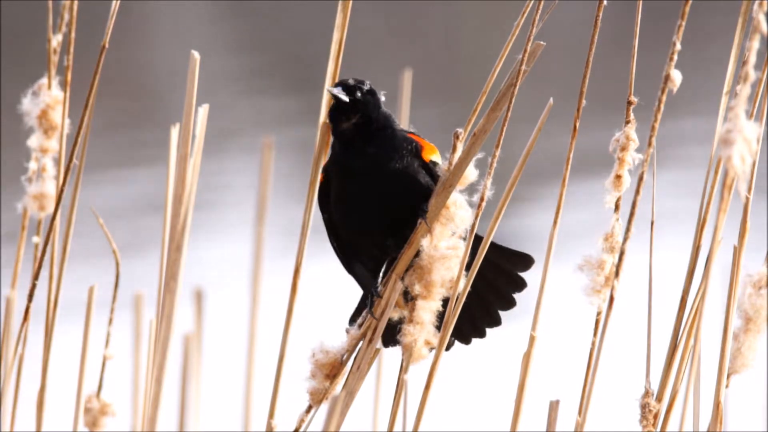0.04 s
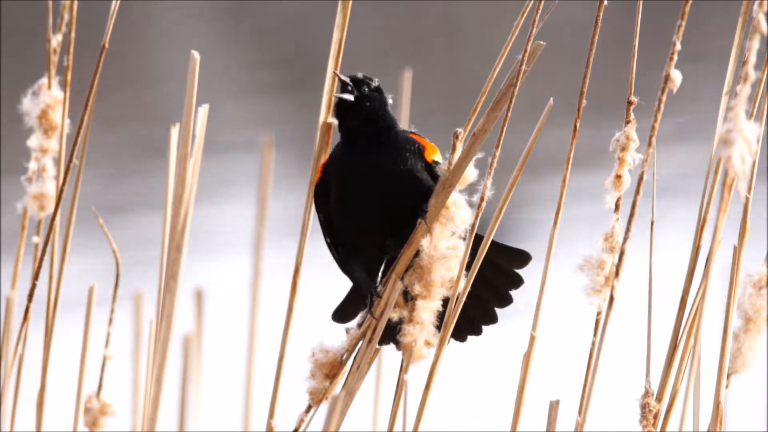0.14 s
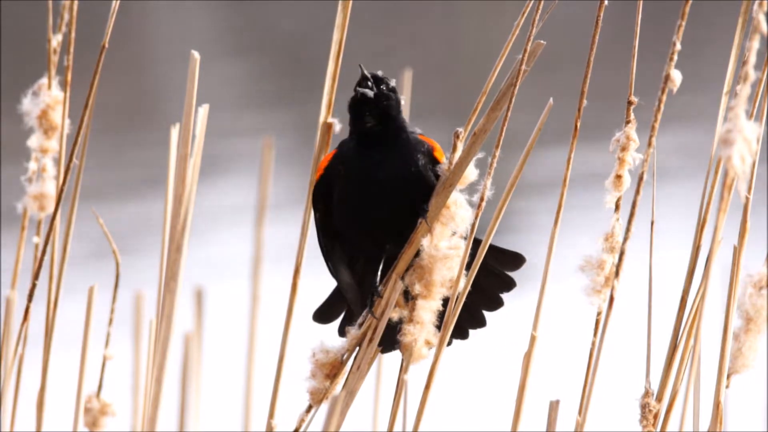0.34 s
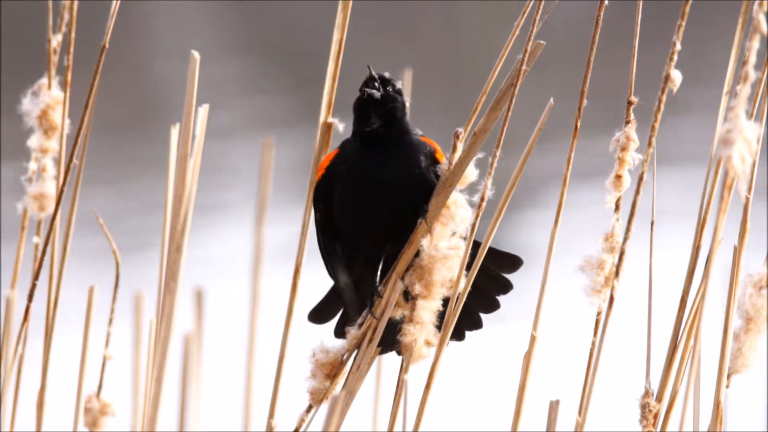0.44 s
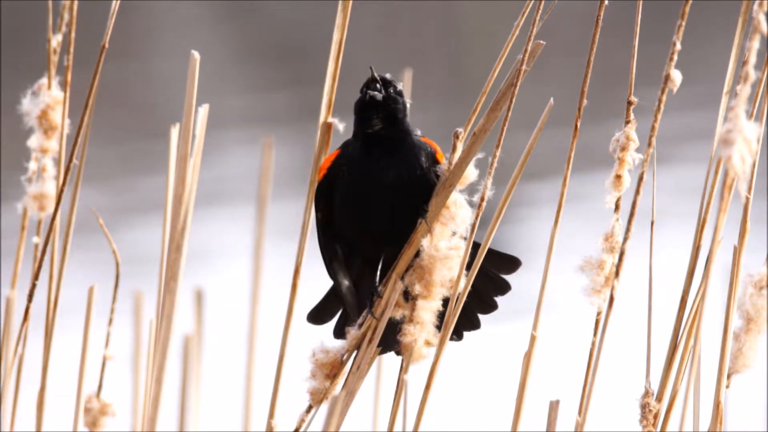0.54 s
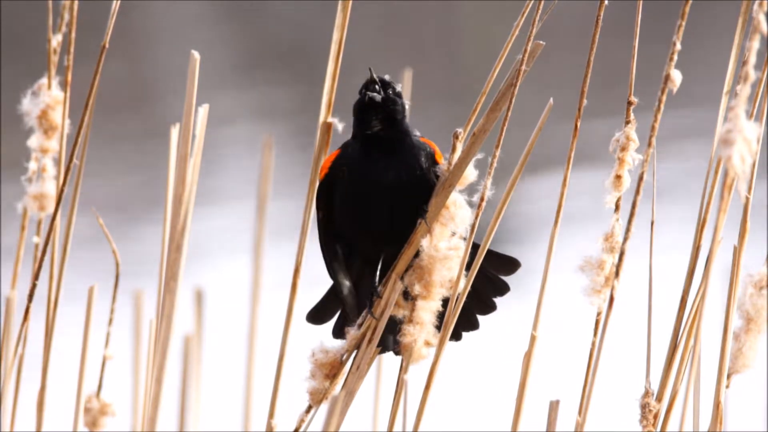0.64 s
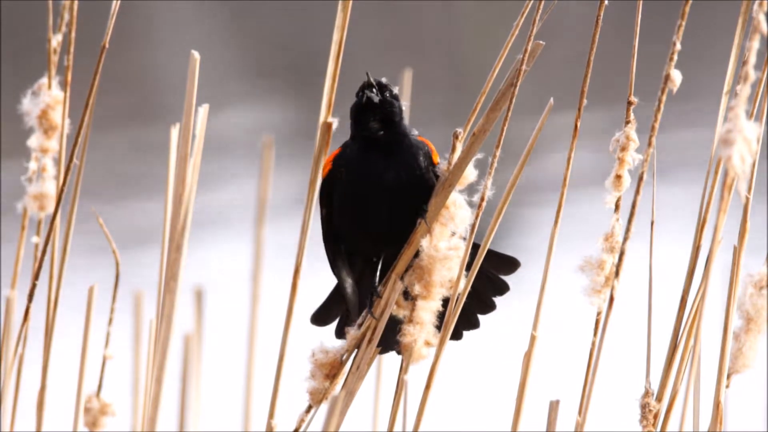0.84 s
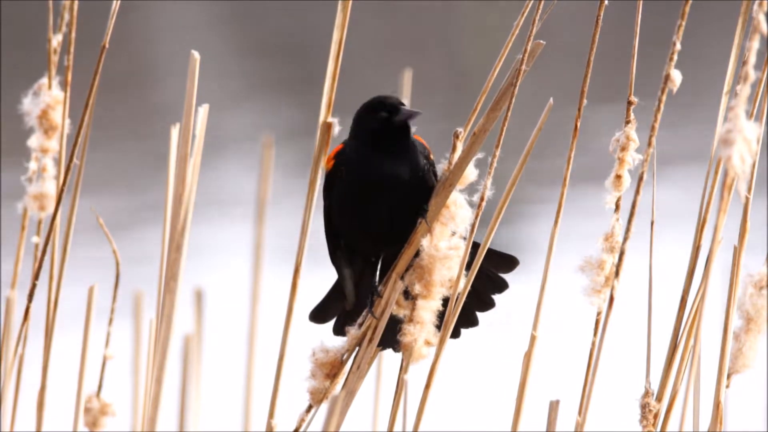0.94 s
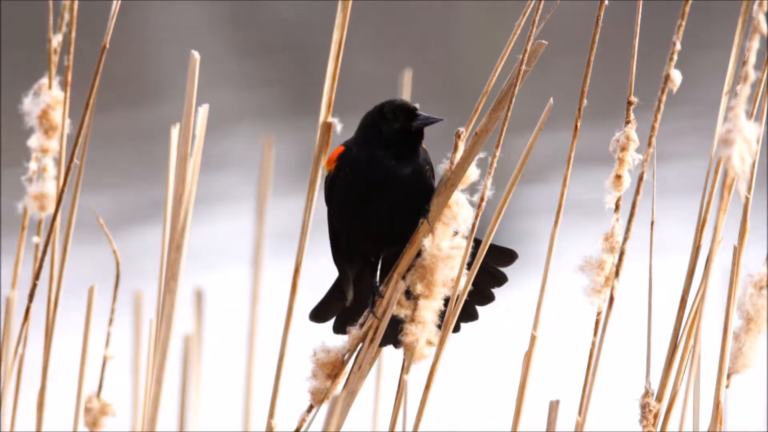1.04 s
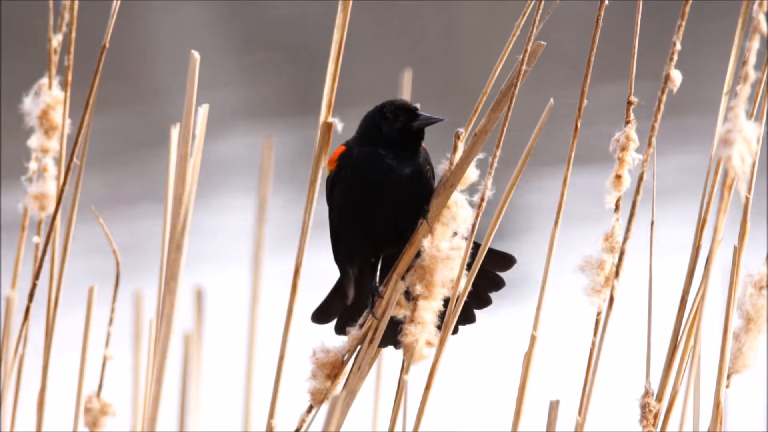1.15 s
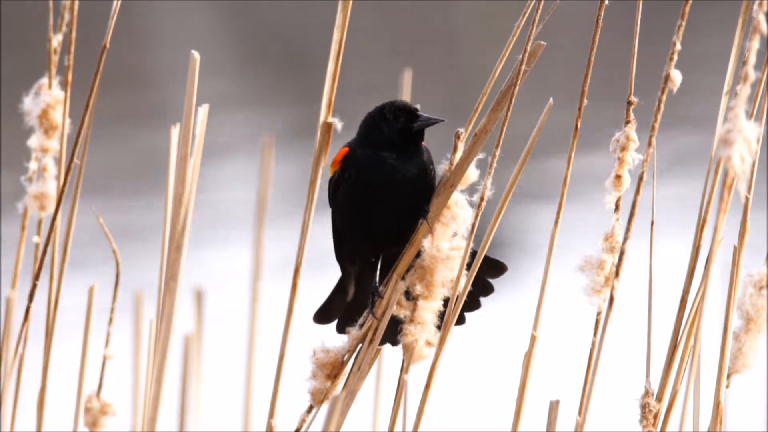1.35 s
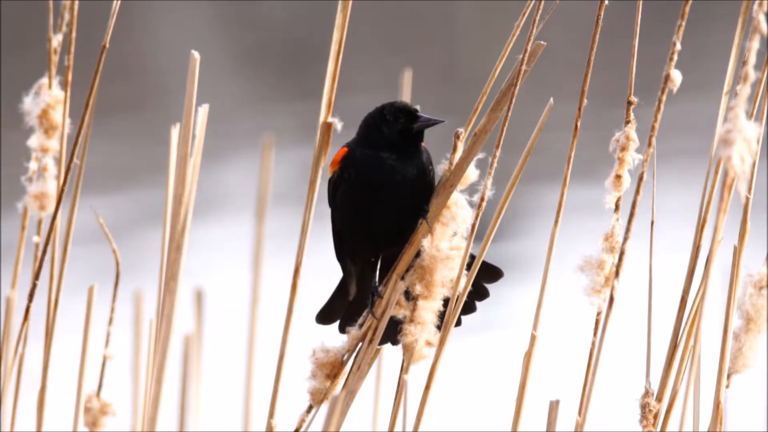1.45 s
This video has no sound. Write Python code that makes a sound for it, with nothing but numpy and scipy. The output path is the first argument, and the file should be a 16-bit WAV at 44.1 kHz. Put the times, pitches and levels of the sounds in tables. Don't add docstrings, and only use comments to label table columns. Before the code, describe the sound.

Perched bird song: brief liquid gurgling notes, a rapid buzzing trill, then fainter rival trills and soft traffic hum.

```python
import sys
import numpy as np
from scipy import signal
from scipy.fft import rfft, irfft
from scipy.io import wavfile
from scipy.ndimage import uniform_filter1d

SR = 44100
rng = np.random.default_rng(int(sys.argv[2]) if len(sys.argv) > 2 else 0)


def wrap_up_sound(samples):
    columns = np.atleast_2d(samples).T
    tamed = np.clip(columns, -1, 1)
    steps = np.round(tamed * 32767).astype(np.int16)
    wavfile.write(sys.argv[1], SR, steps)


def gain_from_decibels(decibels):
    exponent = np.asarray(decibels, float) / 20
    return 10 ** exponent


N = 66150
T = np.arange(N) / SR
SIDES = np.array([[1], [-1]])


def curve(points, hz):
    p = np.array(points, float)
    return np.interp(np.log(hz), np.log(p[:, 0]), p[:, 1])


def level(x, db):
    return x * gain_from_decibels(db) / np.sqrt(np.mean(x ** 2))


def walk(rate_hz, n=N):
    k = int(SR / rate_hz)
    smooth = uniform_filter1d(rng.standard_normal(n), k, mode="wrap")
    return uniform_filter1d(smooth, k, mode="wrap") * np.sqrt(1.3 * k)


def gate(start, length, attack, release, t=T):
    g = np.clip(np.minimum((t - start) / attack, (start + length - t) / release), 0, 1)
    return np.sin(g * np.pi / 2) ** 2


def span(start, length):
    return slice(max(int(start * SR), 0), min(int((start + length) * SR) + 1, N))


def band(x, hz, width):
    edges = [hz - width / 2, hz + width / 2]
    return signal.sosfilt(signal.butter(2, edges, "band", fs=SR, output="sos"), x)


def notes(table, edge_s, waver_hz, flutter_db, throb=0, slope_db=0):
    throb_hz = 155
    out = np.zeros(N)
    for start, length, a_hz, b_hz, db in table:
        first, lasts = start - edge_s / 2, length + edge_s
        s = span(first, lasts)
        t = T[s]
        waver, pace, flutter = (walk(rate, 8192)[:len(t)] for rate in (150, 40, 120))
        hz = np.interp(t, [start, start + length], [a_hz, b_hz]) + waver_hz * waver
        chop = 1 + throb * np.cos(2 * np.pi * np.cumsum(throb_hz * (1 + 0.18 * pace)) / SR)
        slope = slope_db * ((t - start) / length - .5)
        env = gate(first, lasts, edge_s, 2 * edge_s, t) * gain_from_decibels(db + 3 + flutter_db * flutter + slope)
        out[s] += env * chop * np.sin(2 * np.pi * np.cumsum(hz) / SR)
    return out


def breath(table):
    out = 0
    for start, length, hz, width, db in table:
        noise = level(band(rng.standard_normal(N), hz, width), db)
        out = out + noise * gate(start, length, length / 2, length / 3) * gain_from_decibels(2 * walk(180))
    return out


# pitch_hz, density_db [dB per Hz]
AIR_COLOUR = [(30, -31), (70, -8), (150, -11), (400, -15), (1400, -15), (3500, -23), (7000, -32),
              (15000, -35)]
# pitch_hz, left_minus_right_db
AIR_LEAN = [(150, -7.5), (400, -1.5), (5000, 0)]
# pitch_hz, likeness [0-1]
AIR_LIKENESS = [(120, 0.9), (4000, 0.8), (12000, 0)]


def air():
    hz = np.maximum(np.arange(N // 2 + 1) * SR / N, 1)
    a, b = rfft(rng.standard_normal((2, N)))
    alike = np.clip(curve(AIR_LIKENESS, hz), 0, 1)
    pair = np.sqrt(1 + alike) * a + np.sqrt(1 - alike) * b * SIDES
    lean = gain_from_decibels(curve(AIR_LEAN, hz) * SIDES / 2)
    rush = level(irfft(pair * lean * gain_from_decibels(curve(AIR_COLOUR, hz)), N), -47.5)
    hum = level(band(rng.standard_normal(N), 139.8, 12), -56.5) * gain_from_decibels(-3.5 * SIDES)
    return rush * gain_from_decibels(.4 * walk(3)) + hum


# pitch_hz, width_hz, level_db
RIVAL_THROAT = [(2727, 213, -2), (3250, 130, -5), (3870, 160, -10.5), (4420, 260, -11), (4906, 130, -9.5)]
# time_s, level_db
RIVAL_LOUDNESS = [(0, -51.5), (.12, -52), (.9, -36.5), (.97, -43), (1.08, -37.5), (1.15, -41.5), (1.3, -37),
                  (1.5, -39.5)]


def rivals():
    pulse_hz, beat_hz, beat_db = 538.7, 33.5, 1.5
    phase = np.cumsum(pulse_hz * (1 + 0.023 * walk(60))) / SR
    pulses = level(np.diff(np.floor(phase), prepend=0), 0) + 0.8 * rng.standard_normal(N)
    beat = 2 * np.pi * np.cumsum(beat_hz * (1 + 0.067 * walk(18))) / SR
    out = 0
    for k, (hz, width, db) in enumerate(RIVAL_THROAT):
        lag = 2.0 * (k > 0)
        throb = gain_from_decibels(beat_db * np.cos(beat - lag) + 1.3 * walk(27))
        out = out + level(band(pulses, hz, 1.71 * width), db) * throb
    return level(out, 0) * gain_from_decibels(np.interp(T, *np.array(RIVAL_LOUDNESS).T))


# start_s, length_s, from_hz, to_hz, level_db
PIPE_NOTES = [(-.02, 0.1, 1439, 1486, -41), (-.02, 0.11, 1226, 1185, -48), (.562, 0.052, 1026, 1080, -44.5),
              (.625, 0.078, 1546, 1598, -44.5), (.76, 0.092, 1609, 1620, -37),
              (.985, 0.014, 1086, 1160, -41.5), (1.03, 0.025, 6500, 6450, -55),
              (1.135, 0.052, 1463, 1470, -49.5), (1.45, 0.066, 1595, 1528, -41.5)]


def pipes():
    return notes(PIPE_NOTES, 0.014, waver_hz=4.2, flutter_db=1)


# pitch_hz, level_db
REED_COLOUR = [(1500, -4), (2500, -13), (3200, -13), (3900, 0)]


def reeds(x, t60_s, spread):
    t = T[:int(SR * t60_s)]
    n = rng.standard_normal((3, N // 2))[:, :len(t)]
    tail = (n[0] + spread * n[1] * SIDES) * gain_from_decibels(-60 * t / t60_s) * (t > .002)
    hz = np.arange(1, N // 2 + 2) * SR / N
    x = irfft(rfft(x) * gain_from_decibels(curve(REED_COLOUR, hz)), N)
    return signal.fftconvolve(x[None], level(tail, 0) / np.sqrt(len(t)), axes=1)[:, :N]


# start_s, length_s, from_hz, to_hz, level_db
LOW_NOTES = [(.122, 0.025, 1070, 1090, -46), (.14, 0.025, 1520, 1690, -49.5),
             (.166, 0.009, 2340, 2310, -40.5), (.171, 0.03, 1540, 1583, -42.5),
             (.175, 0.016, 1997, 1905, -37.5), (.19, 0.032, 1960, 1970, -51), (.302, .02, 1560, 1600, -38),
             (.302, .024, 2050, 2090, -29), (.322, .008, 2600, 2750, -39), (.33, .008, 3470, 3490, -34),
             (.331, .013, 2800, 2860, -37), (.326, .012, 2130, 2200, -47), (.364, .009, 2870, 2820, -29),
             (.374, .007, 2880, 2860, -31), (.928, 0.012, 2873, 2760, -32)]


def low_voice():
    return notes(LOW_NOTES, .004, waver_hz=20, flutter_db=2, slope_db=-8)


# start_s, length_s, centre_hz, width_hz, level_db
RASP_PUFFS = [(0.146, 0.095, 6700, 4620, -49), (.195, 0.028, 11160, 1490, -52.5),
              (0.292, 0.025, 10800, 1190, -51), (0.309, 0.039, 10760, 1910, -53.5),
              (0.171, 0.15, 3520, 1870, -39.5), (0.292, 0.058, 6500, 1400, -48.5)]


def rasp():
    return breath(RASP_PUFFS)


# start_s, length_s, from_hz, to_hz, level_db
SWELL_NOTES = [(.187, .024, 4780, 4850, -41), (.231, 0.0484, 4980, 4957, -30)]


def swells():
    return notes(SWELL_NOTES, .003, waver_hz=16, flutter_db=2, slope_db=12)


# start_s, length_s, from_hz, to_hz, level_db
HIGH_NOTES = [(.188, .018, 5500, 5600, -50), (.192, .019, 6400, 6450, -45), (.216, .012, 4890, 4940, -41),
              (.288, .009, 4950, 5000, -42), (.3, .013, 4960, 4950, -44), (.222, .07, 1650, 1670, -50),
              (.2168, .002, 3350, 3300, -23), (.337, .008, 4800, 4880, -39), (.345, .012, 4950, 4870, -30),
              (.357, .009, 4880, 4860, -25), (.349, .007, 3550, 3350, -22), (.356, .008, 3700, 3500, -27),
              (.373, .012, 4880, 4890, -34), (.372, .011, 3450, 3450, -33)]


def high_voice():
    return notes(HIGH_NOTES, .004, waver_hz=20, flutter_db=2)


# start_s, length_s, from_hz, to_hz, level_db
GURGLE_PARTIALS = [(.206, .007, 3200, 3330, -33), (.2165, .003, 4200, 4200, -39),
                   (.223, .017, 3380, 3420, -25.5), (.24, .056, 3300, 3360, -35.5),
                   (.214, .016, 2900, 2800, -35), (.23, .03, 2760, 2800, -29),
                   (.262, .026, 2850, 2760, -33), (.288, .014, 2600, 2510, -32),
                   (.247, .025, 3950, 4050, -39), (.272, .02, 3800, 3700, -43)]


def gurgle():
    return notes(GURGLE_PARTIALS, 0.0022, waver_hz=25, flutter_db=1, throb=.35)


BUZZ_HARMONICS = np.array([-4, -2, 4, -3, 0.5, -1])[:, None]


def buzz(end, length, a_hz, b_hz, db):
    membrane_hz, throat_width_hz, chirp_s = 705, 680, 0.0011
    luck, out, s = rng.standard_normal(12), np.zeros(N), span(end - length, length)
    t = T[s]
    centre = np.interp(t, [end - length, end], [a_hz, b_hz]) + 150 * luck[0]
    f0 = membrane_hz * (1 + 0.017 * luck[1])
    k = np.arange(3, 9)[:, None]
    bend = np.sign(a_hz - b_hz) * np.pi * chirp_s * f0 / 4 * (k - 6) ** 2 + .4 * luck[3:9, None]
    throat = np.exp(-.5 * ((k * f0 - centre) / throat_width_hz) ** 2)
    waves = np.cos(2 * np.pi * k * f0 * (t - end + 0.000619) + bend)
    stack = gain_from_decibels(np.reshape(BUZZ_HARMONICS, (-1, 1))) * throat * waves
    env = gate(end - length, length, length / 3, length / 3, t)
    out[s] = stack.sum(0) * env * gain_from_decibels(db + 0.5 * luck[2])
    return out


# end_s, fall_level_db, earlier_rise_level_db
LEAD_IN_BURSTS = [(.3535, -19, -32), (.3712, -21, -32)]
# start_s, held_s, level_db, pitch_hz
TRILL_BEATS = [(0.3859, 0.015, -19.0, 2911), (0.4098, 0.018, -17.5, 2902), (0.4362, 0.0175, -17.0, 2906),
               (0.4614, 0.0185, -16.6, 2892), (0.4875, 0.0181, -15.7, 2885), (0.5121, 0.022, -16.3, 2906),
               (0.5414, 0.0224, -16.2, 2913), (0.5722, 0.0207, -15.7, 2871), (0.6008, 0.0198, -15.6, 2875),
               (0.6281, 0.019, -15.7, 2895), (0.6533, 0.0213, -16.3, 2892), (0.6823, 0.0199, -15.8, 2895),
               (0.7099, 0.0192, -16.4, 2882), (0.7367, 0.0187, -16.2, 2885), (0.7634, 0.017, -16.3, 2909),
               (0.789, 0.0208, -15.4, 2868), (0.8179, 0.0188, -15.5, 2865), (0.8444, 0.018, -15.0, 2861),
               (0.8702, 0.021, -15.5, 2841), (0.8991, 0.025, -17, 2830)]
# multiple [of the whistle], level_db
WHISTLE_PARTIALS = [(1.5, -26.5), (2, -31.5), (2.5, -53.5), (3, -42), (4, -56), (4.5, -55)]


def trill():
    attack_s, release_s, arch_hz, sag_hz = .007, .0045, 48, 80
    first, last = TRILL_BEATS[0][0], TRILL_BEATS[-1][0]
    out, env, hz = 0, 0, TRILL_BEATS[0][3]
    for start, held, db, beat_hz in TRILL_BEATS:
        u = np.clip((T - start) / held, 0, 1)
        shape = beat_hz + arch_hz * np.sin(np.pi * u) ** 2 - sag_hz * (u - .3)
        hz = np.where(T > start - .003, shape, hz)
        edges = gate(start - attack_s / 2, held + (attack_s + release_s) / 2, attack_s, release_s)
        env = env + gain_from_decibels(db + 3.5 - 0.81 * u) * edges
        out = out + buzz(start + .0022, .006, 5400, 3200, -25)
        if start < last:
            out = out + buzz(start + held + .005, .008, 4000, 5500, -27)
    for end, fall_db, rise_db in LEAD_IN_BURSTS:
        out = out + buzz(end, .007, 4900, 3100, fall_db)
        out = out + buzz(end - .006, .007, 4700, 5400, rise_db)
    leak = gain_from_decibels(-27.5) * gate(first, last - first, 0.0042, 0.0083)
    phase = 2 * np.pi * np.cumsum(hz + 14 * walk(520)) / SR
    tire = gain_from_decibels(-3 * (T - .65) / 0.99) * gate(0, .921, .01, 0.026)
    over = 0
    for k, db in WHISTLE_PARTIALS:
        over = over + gain_from_decibels(db + 2 * walk(200)) * np.sin(k * phase + .8 * walk(250))
    overtones = (env + leak * gain_from_decibels(4.5)) * tire * over
    whistle = env * gain_from_decibels(walk(140)) * np.sin(phase)
    between = leak * gain_from_decibels(2 * walk(210)) * np.cos(phase)
    return out + whistle + overtones + between


def singer():
    song = trill() + low_voice() + high_voice() + swells() + gurgle()
    loud = np.sqrt(uniform_filter1d(song ** 2, size=200).clip(0)) + 0.065
    bent = song * np.abs(song) / loud + song ** 2 / loud
    overtones = band(band(bent, 7400, 4900), 8500, 4900)
    return song + gain_from_decibels(-26) * overtones + rasp()


# start_s, length_s, from_hz, to_hz, level_db
PURR_CALLS = [(.815, .125, 1425, 1383, -43.5), (.948, .05, 4980, 4930, -45), (1.083, .03, 5000, 4960, -43),
              (1.12, .03, 4950, 4900, -45), (1.255, .03, 4900, 4900, -46), (.955, .035, 3850, 3800, -49)]


def purrs():
    return notes(PURR_CALLS, 0.022, waver_hz=29.6, flutter_db=2.5, throb=0.33)


# start_s, level_db, pitch_hz
FLECK_BEATS = [(0.9536, -38.5, 2745), (0.9786, -35, 2806), (0.9996, -34, 2700), (1.0486, -37, 2640),
               (1.116, -32, 2710), (1.1539, -31.5, 2760), (1.1848, -27.5, 2810), (1.2187, -29, 2723),
               (1.2492, -29.5, 2695), (1.2825, -30.5, 2750), (1.333, -38, 2770), (1.3709, -41, 2940),
               (1.3883, -35, 2755), (1.4357, -35, 2670)]


def flecks():
    beats = [(start, 0.011, hz, hz - 40, db - 5) for start, db, hz in FLECK_BEATS]
    out = notes(beats, 0.00491, waver_hz=28.8, flutter_db=3.5)
    for start, db, hz in FLECK_BEATS:
        out = out + buzz(start + .008, .014, 4000, 3200, db - 14.5)
    return out


# start_s, length_s, centre_hz, width_hz, level_db
RUN_UP_PUFFS = [(1.11, .07, 3800, 700, -41), (1.12, .12, 3350, 400, -42)]


def run_up():
    return breath(RUN_UP_PUFFS)


def scene():
    bird = singer()
    far = rivals() + flecks() + run_up() + pipes() + purrs()
    near = bird * gain_from_decibels(-.1 * SIDES) + gain_from_decibels(-7) * reeds(bird, .08, spread=0.51)
    distant = far * gain_from_decibels(-.4 * SIDES) + gain_from_decibels(-7) * reeds(far, .3, spread=.6)
    return near + distant + air()


def low_pass(x):
    return signal.sosfilt(signal.butter(12, 15670, fs=SR, output="sos"), x)


def record(dry):
    return low_pass(dry)


dry = scene()
out = record(dry)
wrap_up_sound(out)
```